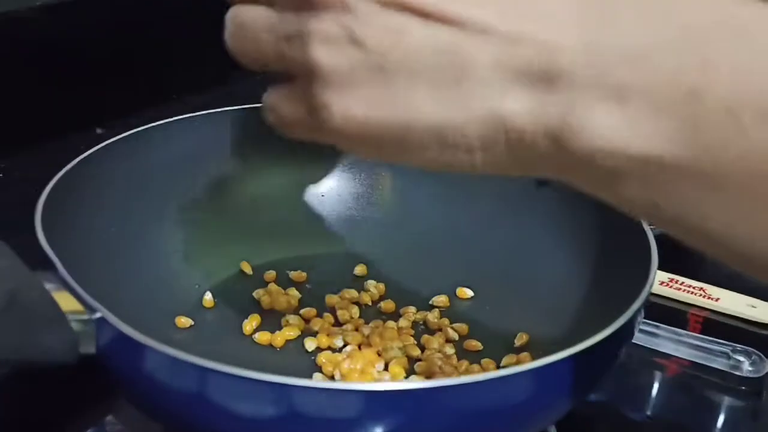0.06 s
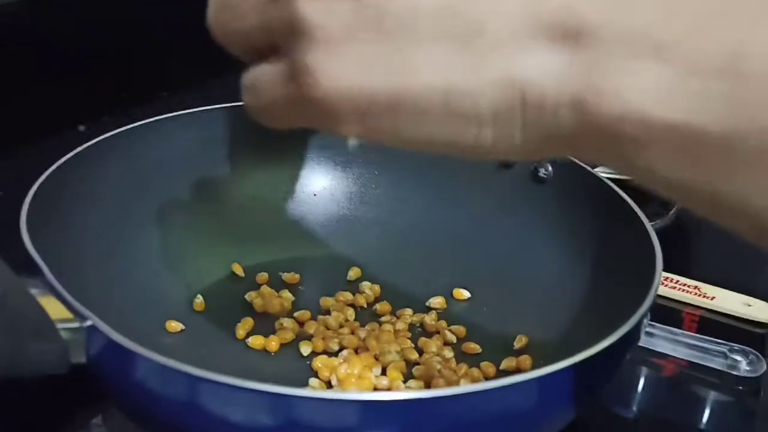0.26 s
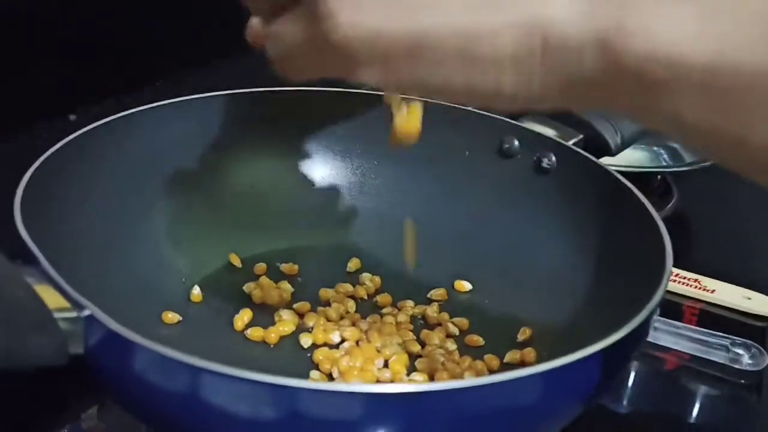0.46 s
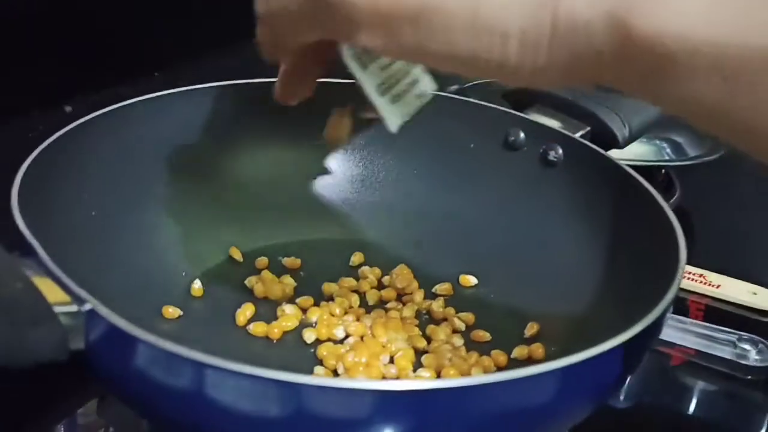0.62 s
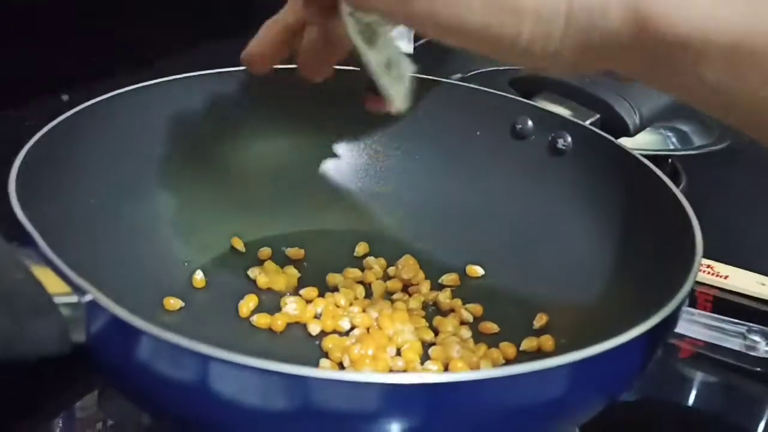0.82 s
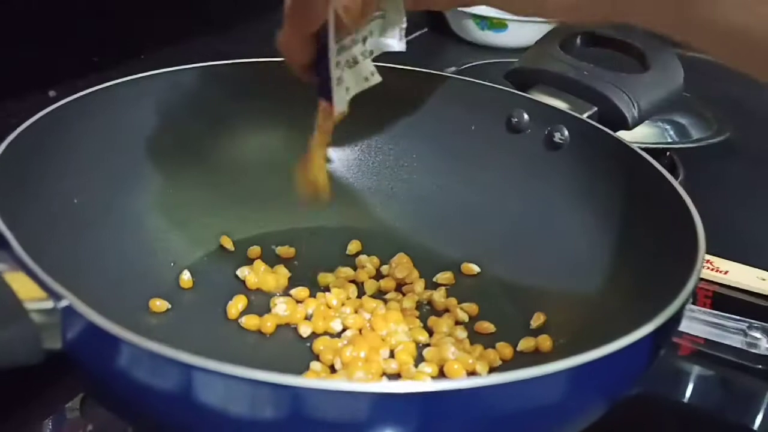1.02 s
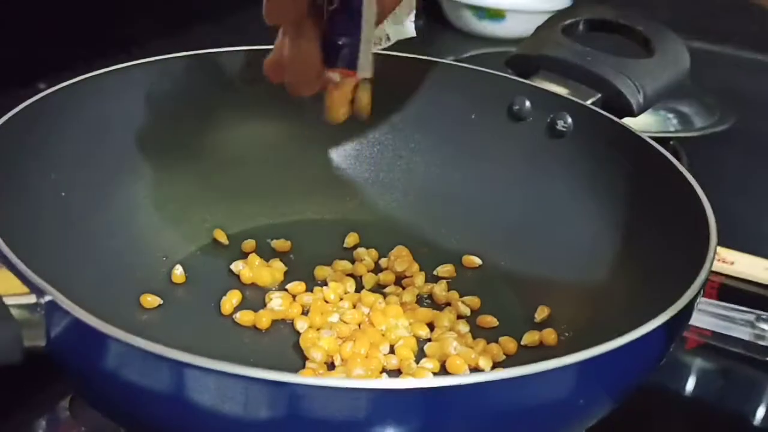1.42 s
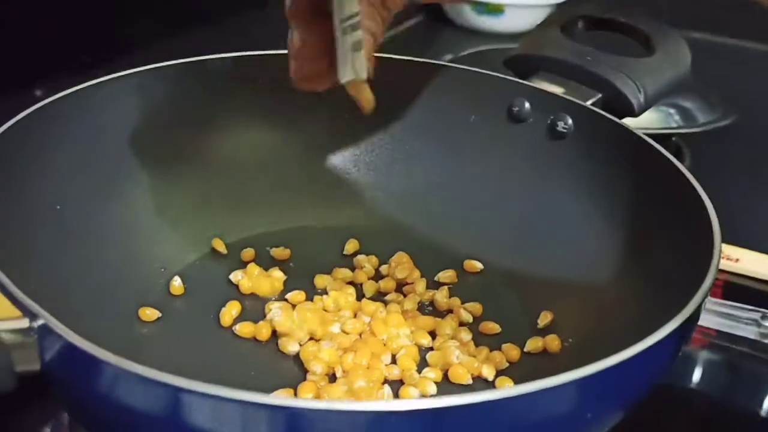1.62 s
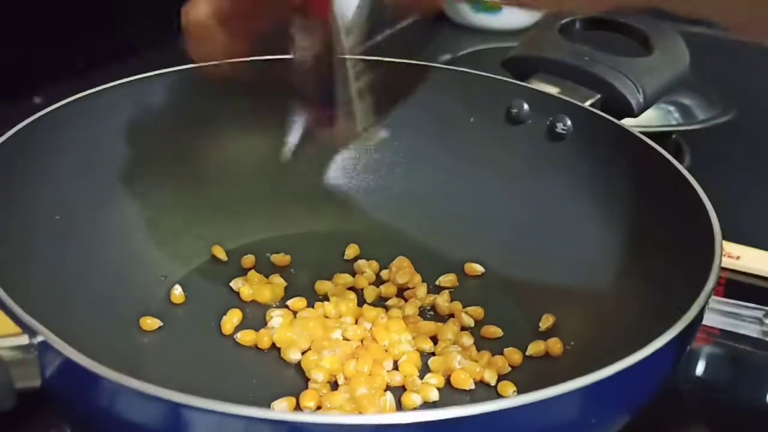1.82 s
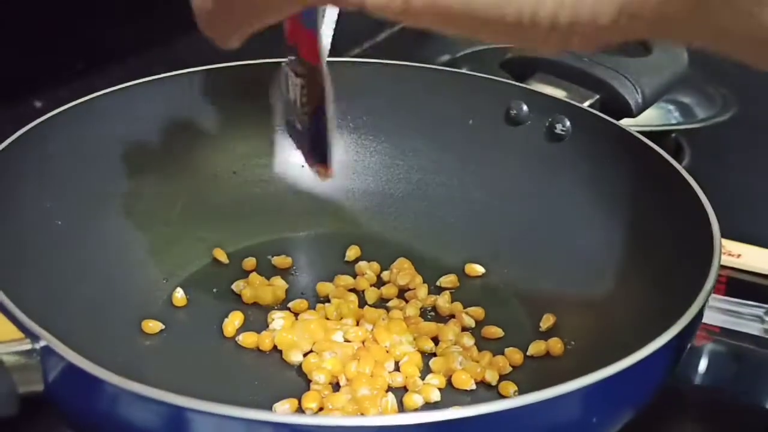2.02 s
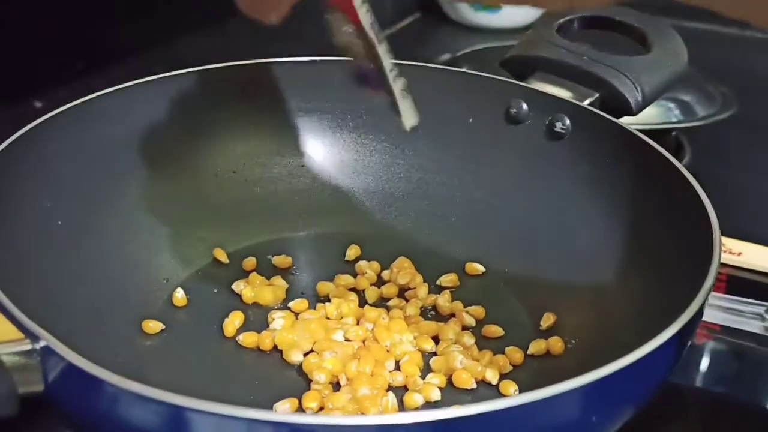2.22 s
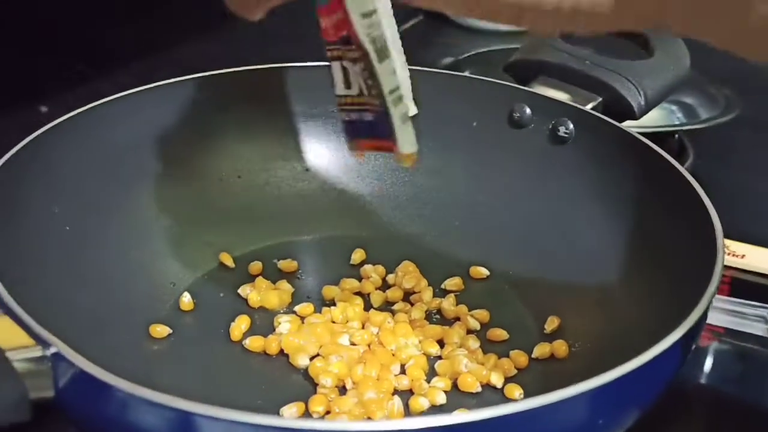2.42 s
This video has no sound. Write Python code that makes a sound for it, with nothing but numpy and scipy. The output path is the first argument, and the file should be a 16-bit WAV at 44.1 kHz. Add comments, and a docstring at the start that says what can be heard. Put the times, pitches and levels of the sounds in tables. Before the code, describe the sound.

Hard corn kernels drop from a crinkling packet, ticking and rattling in a metal pan.

```python
"""Bright clicks over a low rumble: popcorn kernels are shaken from a small packet into a frying pan
on a stove. Each impact, on the metal or on the heap, radiates a click, thuds in the pan's base and
excites the pan's resonant modes. Between the drops the packet snaps and rustles as its creases
buckle. The small kitchen answers clicks and snaps with early reflections and a reverberant tail."""
import sys
import numpy as np
from scipy import signal
from scipy.fft import rfft, irfft, next_fast_len
from scipy.io import wavfile

SR = 44100
rng = np.random.default_rng(int(sys.argv[2]) if len(sys.argv) > 2 else 0)


def wrap_up_sound(samples):
    """Save the sound to the file named by the first command line argument, as 16-bit audio."""
    columns = np.atleast_2d(samples).T
    # keep every value between -1 and 1, then stretch to whole-number steps
    tamed = np.clip(columns, -1, 1)
    steps = np.round(tamed * 32767).astype(np.int16)
    wavfile.write(sys.argv[1], SR, steps)


N = 112454
T = np.arange(N) / SR
BURST_SAMPLES = 4096

# envelope of the rumble: time_s, level_db
RUMBLE_ENVELOPE = [(0, -71), (.1, -63.5), (.35, -56.5), (1.1, -56.5), (1.42, -58.5), (2.2, -54.5),
                   (2.42, -53.5), (2.55, -68.5)]
# spectrum of the rumble: frequency_hz, level_db
RUMBLE_SPECTRUM = [(20, -20), (45, -0.5), (72, 4), (110, -6.5), (160, 1.5), (200, 3), (270, -4.5),
                   (500, -9), (1200, -38), (4000, -34)]
# spectrum of the steady hiss: frequency_hz, level_db
HISS_SPECTRUM = [(50, -3), (300, 2), (1000, 2), (4000, -26), (8000, -8), (13000, -15)]
# reverberation time of the kitchen: frequency_hz, t60_s
ROOM_DECAY = [(150, 0.24), (600, 0.96), (1500, 0.42), (3600, 0.64), (7500, 0.53), (12000, 0.36)]
# colouring of the reverberant tail: frequency_hz, gain_db
ROOM_SPECTRUM = [(100, -22), (700, -5.5), (1500, -10.5), (3000, -3.5), (5000, -15.5), (7500, -8),
                 (12000, -10.5)]
# side signal relative to the diffuse sound: frequency_hz, gain_db
SIDE_SPECTRUM = [(100, -49), (600, -42.5), (2400, -46), (3300, -38.5), (4100, -20.5), (5500, -7),
                 (9000, -7), (13000, -10)]
# brief dips in level: centre_s, depth_db
LEVEL_DIPS = [(0.506, 6.5), (.926, 18), (1.497, 11)]
# envelope of the packet's rustle: time_s, level_db
RUSTLE_ENVELOPE = [(0, -63.5), (.095, -73.5), (.12, -46), (.2, -45.5), (.4, -47), (.68, -52), (.82, -39),
                   (.91, -44.5), (1.03, -41.5), (1.2, -42.5), (1.47, -53.5), (1.68, -46), (1.89, -49),
                   (2.05, -44), (2.22, -63), (2.36, -57), (2.46, -59.5), (2.55, -92)]
# spectrum of the rustle: frequency_hz, level_db
RUSTLE_SPECTRUM = [(150, -34), (700, -3), (1200, -5.5), (2000, 1.5), (3000, 0), (5000, 5), (7800, -9.5),
                   (10000, -10), (13000, -10.5)]
# envelope of the packet rubbing on the fingers: time_s, level_db
RUB_ENVELOPE = [(2.17, -65), (2.22, -40), (2.278, -46.5), (2.297, -44.5), (2.35, -45), (2.41, -54),
                (2.47, -57.5), (2.55, -86)]
# spectrum of the rub: frequency_hz, level_db
RUB_SPECTRUM = [(900, -17.5), (1700, -5.5), (2100, 2), (2650, 0), (3300, -3.5), (5000, -26)]
# snaps of the packet: start_s, energy_db, centre_hz, decay_ms
CREASE_SNAPS = [(0.166, -23, 3580, 2), (0.386, -6.5, 4640, 2.6), (.708, -12.5, 4550, 1.7),
                (.792, 9.5, 3400, 3.2), (0.81, -5, 3060, 4.9), (1.098, -6, 4500, 6.2),
                (1.2537, -6, 4260, 2.2), (1.786, -5.5, 3100, 2), (2.208, -8, 3360, 4.7),
                (2.219, -3.5, 4030, 4.5), (2.29, -3, 2850, 1.5), (2.4275, -16.5, 2800, 4.2)]
# resonances of the pan: frequency_hz, level_db, bandwidth_hz
PAN_MODES = [(742, -19, 140), (1456, -19.5, 130), (1803, -15.5, 200), (2760, -17.5, 320), (3270, -19, 67),
             (3970, -11, 780), (4650, -16.5, 73), (5720, -12, 280), (6070, -5.5, 570), (7020, -7.5, 120),
             (7740, -8, 600), (8570, -11, 310), (8270, -4.5, 840), (12300, -18, 530)]
# spectrum of the base's thud: frequency_hz, level_db
THUD_SPECTRUM = [(25, -18), (55, -8), (90, 0.5), (160, -1.5), (280, 0.5), (500, -5.5), (1200, -27),
                 (4000, -84)]
# spectrum of the wall's knock: frequency_hz, level_db
KNOCK_SPECTRUM = [(100, -15), (370, -5.5), (560, -5.5), (770, -0.5), (1000, -7.5), (1600, -7.5),
                  (3000, -40.5), (8000, -41)]
# spectrum common to all clicks: frequency_hz, level_db
CLICK_SPECTRUM = [(100, -43), (400, -18.5), (750, -18), (1150, -14.5), (1700, -12), (2300, -9), (3300, -5),
                  (4600, 0.5), (6200, -3), (7600, 0.5), (8600, -2), (10200, -8), (11600, -3.5),
                  (13000, -14.5)]
# kernel landings, the last three levels relative to the click:
# start_s, click_db, pitch_hz, tilt_db_per_octave, decay_ms, thud_db, knock_db, rattle_db
LANDINGS = [ (0.1018, -8.5, 4500, 0.61, 4.5, -21.5, -18, -2), (0.112, -14, 5500, -2.4, 2.6, -20, -28, -20),
            (0.2098, 5.5, 5400, -0.7, 3.6, -20.5, -36, 0), (0.215, 6, 7100, -1.6, 5.8, -34, -13, 2.5),
            (0.3263, -1, 6800, 0.45, 7.5, -38, -20.5, -2), (0.3553, -1, 7700, 1.3, 5.6, -22, -34, 0),
            (0.396, 4, 7300, -3, 1.8, -22.5, -34, -5), (0.4276, 8, 6300, 0, 3.7, -21.5, -22.5, -7.5),
            (0.5131, 10.5, 8100, 1.8, 2.9, -22, -14.5, 0.5), (.571, 0.5, 7500, -0.059, 13, -16.5, -14, -4),
            (0.7187, -8, 6550, 0, 1.9, -27, -26, -0.5), (0.754, 4, 5750, -1.8, 1.3, -23, -23.5, 0),
            (.762, 6, 6800, 0, 4.4, -20, -30, 0), (.809, 2.5, 5760, 2, 4.2, -23, -38, -12),
            (.885, -3.5, 6860, 1.7, 7.3, -28, -18, -1), (.933, -0.5, 6040, 4, 6.6, -35, -39, -19),
            (0.938, -1, 4330, 1, 1.9, -23, -28, 3), (0.9398, 10, 8100, 0, 3, -12.5, -15, -3),
            (1.1108, -1, 6300, -0.63, 1.8, -18.5, -17, 0.5), (1.162, 2, 6500, -0.75, 5.2, -28, -40, -1),
            (1.214, -9.5, 6940, 0, 2.3, -30, -26, -21), (1.279, 6, 6400, 2.2, 2.7, -17, -20.5, -36),
            (1.2995, -4, 4760, -0.81, 3, -30, -22, -23), (1.4248, -4, 3000, 0.15, 1.9, -18, -25, 2.5),
            (1.5089, 1.5, 5300, 1.2, 1, -17, -16, 5), (1.5099, 9.5, 7440, 1, 1.5, -21.5, -16, -9),
            (1.586, 8, 7500, -0.95, 2, -25, -25, -8), (1.665, -9, 6550, -1.7, 3.5, -28, -34, 6),
            (1.6992, -8.5, 7000, -1.1, 3.6, -37, -9, -6), (1.7146, 2.5, 5600, -0.69, 0.9, -19.5, -15, -3),
            (1.743, -5, 7000, 1, 1.7, -19, -25, -25), (1.797, -5.5, 7100, -0.42, 1.3, -28, -46, 4),
            (1.807, 0, 5670, 0, 1, -43, -19, -18), (1.834, -3, 7500, -3.3, 2.9, -20, -21, -2),
            (1.9298, 8.5, 6760, 0.36, 2, -19, -16.5, -34), (1.944, -6, 7400, 0.47, 3.4, -24, -30, -16),
            (1.958, -14, 6200, 0.22, 1.4, -13, -30, -17), (1.979, -12.5, 7600, 1, 9, -17, -23, 18),
            (1.9858, 10, 7060, 0.26, 2.7, -22, -22, -12), (2.087, 7.5, 6740, -1.55, 1.4, -18.5, -29, -21),
            (2.116, -5, 7000, 1, 2.9, -33, -35, -18), (2.189, -2.5, 5140, 1.9, 1.4, -14, -14, 4.5),
            (2.287, 0.5, 8000, 1.5, 3.3, -18, -20.5, -21)]


def from_db(db):
    """Amplitude grows tenfold every 20 dB."""
    return 10 ** (np.asarray(db) / 20)


def unit_energy(x):
    """Normalisation: the squared samples sum to 1."""
    return x / np.sqrt(np.sum(x ** 2) + 1e-20)


def at_hz(points, hz):
    """Interpolation on a logarithmic frequency axis."""
    frequencies, values = np.transpose(points)
    return np.interp(np.log(hz + 1), np.log(frequencies), values)


def hump(hz, centre_hz, width_octaves):
    """A spectral peak, Gaussian in log frequency."""
    return np.exp(-.5 * (np.log2((hz + 1) / centre_hz) / width_octaves) ** 2)


def envelope(points):
    """Gain over time, interpolated in decibels."""
    return from_db(np.interp(T, *np.transpose(points)))


def colour(x, curve):
    """Minimum-phase filtering by a dB table or function: folding the cepstrum makes it causal."""
    n = 2 * next_fast_len(len(x))
    hz = np.arange(n // 2 + 1) * SR / n
    gain_db = curve(hz) if callable(curve) else at_hz(curve, hz)
    cepstrum = irfft(np.log(from_db(gain_db)))
    cepstrum[1:n // 2] *= 2
    cepstrum[n // 2 + 1:] = 0
    return irfft(rfft(x, n) * np.exp(rfft(cepstrum)))[:len(x)]


def noise(spectrum):
    """Spectral shaping of white noise; rms 1."""
    return unit_energy(colour(rng.standard_normal(N), spectrum)) * np.sqrt(N)


def grains(per_s, spread_db):
    """Shot noise: independent tiny clicks of uneven size; rms 1."""
    sizes = from_db(spread_db * np.minimum(rng.exponential(1, N), 5)) * rng.choice([-1, 1], N)
    return unit_energy(sizes * (rng.random(N) < per_s / SR)) * np.sqrt(N)


def burst(decay_ms):
    """Damping: densely packed vibrations decay exponentially; energy 1."""
    t_ms = T[:BURST_SAMPLES] * 1000
    return unit_energy(rng.standard_normal(BURST_SAMPLES) * np.exp(-t_ms / decay_ms))


def contact(decay_ms, first_touch=0.58):
    """Impulsive excitation: a hard first touch, then a damped burst."""
    return first_touch * signal.unit_impulse(BURST_SAMPLES) + burst(decay_ms)


def add(out, start_s, sound):
    """Superposition: a sound joins the mix at its start time."""
    i = int(start_s * SR)
    out[i:i + len(sound)] += sound[:N - i]


def background():
    """Two bands of random noise: a slowly varying rumble and a steady hiss."""
    return envelope(RUMBLE_ENVELOPE) * noise(RUMBLE_SPECTRUM), from_db(-67.5) * noise(HISS_SPECTRUM)


def kitchen(direct, gap_s=.003):
    """Reverberation: early reflections and a diffuse tail, each band decaying at its own rate."""
    t, tail = T[:SR], 0
    white, hz = rfft(rng.standard_normal(SR)), np.arange(SR // 2 + 1)
    edges_hz = np.geomspace(40, 16000, num=13)
    for low, high in zip(edges_hz, edges_hz[1:]):
        band = irfft(white * (hz >= low) * (hz < high), SR)
        t60_s = at_hz(ROOM_DECAY, np.sqrt(low * high))
        tail = tail + band * unit_energy(from_db(-60 * t / t60_s) * (t > gap_s))
    response = colour(tail, ROOM_SPECTRUM)
    add(response, gap_s, from_db(-8.5) * burst(decay_ms=9.2))   # off the pan's wall and the stove
    return signal.fftconvolve(direct, response)[:N]


def packet_rub():
    """Friction noise: the emptied packet rubs against the fingers."""
    onset_s = RUB_ENVELOPE[0][0]
    return envelope(RUB_ENVELOPE) * (T > onset_s) * noise(RUB_SPECTRUM)


def packet_rustle():
    """Buckling and friction: the packet crinkles while kernels slide inside it."""
    crinkles = grains(per_s=900, spread_db=2)
    sliding = 0.99 * rng.standard_normal(N)
    rustle = unit_energy(colour(crinkles + sliding, RUSTLE_SPECTRUM)) * np.sqrt(N)
    return envelope(RUSTLE_ENVELOPE) * rustle


def packet_snaps(skirt_db=-11, bass_cut_hz=580):
    """Snap-through buckling: each crease flips over and excites one broad resonance."""
    out = np.zeros(N)
    for start_s, energy_db, centre_hz, decay_ms in CREASE_SNAPS:
        def spectrum(hz):
            resonance = hump(hz, centre_hz, width_octaves=0.48) + from_db(skirt_db)
            return 20 * np.log10(resonance * (hz + 1) / (hz + bass_cut_hz))
        add(out, start_s, from_db(energy_db) * unit_energy(colour(contact(decay_ms), spectrum)))
    return out


def pan_wall(mode_hz=760, mode_db=-13, t60_s=.35):
    """Free vibration: every knock leaves the wall's lowest mode ringing as a damped sinusoid."""
    out, t = np.zeros(N), T[:SR]
    for start_s, click_db, *_, knock_db, _ in LANDINGS:
        pitch_hz = mode_hz * rng.normal(1, .012)
        ring = np.sin(2 * np.pi * pitch_hz * t) * from_db(-60 * t / t60_s)
        add(out, start_s, from_db(click_db + knock_db + mode_db) * unit_energy(ring))
    return out


def pan_ring(coupling_db=-3.5, rattle_t60_s=0.4):
    """Forced vibration: after each landing a dying rattle of kernels drives the pan's modes."""
    start_s, click_db, *_, rattle_db = np.transpose(LANDINGS)
    energy_in = np.zeros(N)
    energy_in[(start_s * SR).astype(int)] = from_db(click_db + rattle_db + coupling_db) ** 2
    retained = from_db(-60 / (rattle_t60_s * SR)) ** 2   # share of energy left after one sample
    power = signal.lfilter([1 - retained], [1, -retained], energy_in)
    rattle = np.sqrt(power) * grains(per_s=2500, spread_db=2.5) + 1e-18
    out = np.zeros(N)
    for k, (hz, mode_db, bandwidth_hz) in enumerate(PAN_MODES):
        radius = np.exp(-np.pi * bandwidth_hz / SR)
        feedback = [1, -2 * radius * np.cos(2 * np.pi * hz / SR), radius ** 2]
        ring = np.sqrt((1 - radius ** 2) / 2) * signal.lfilter([1, 0, -1], feedback, rattle)
        out += (-1) ** k * from_db(mode_db) * ring   # modes alternate in polarity
    return out


def kernel_impacts(peak_db=6, thud_roughness=0.49):
    """Impact sound: each kernel clicks at its own pitch, thuds in the base and knocks the wall."""
    out = np.zeros(N)
    for start_s, click_db, pitch_hz, tilt_db_per_octave, decay_ms, thud_db, knock_db, _ in LANDINGS:
        def click_spectrum(hz):
            peak = peak_db * hump(hz, pitch_hz, width_octaves=0.28)
            tilt = tilt_db_per_octave * np.log2(np.maximum(hz, 1000))
            return at_hz(CLICK_SPECTRUM, hz) + peak + tilt
        push = signal.unit_impulse(BURST_SAMPLES) + thud_roughness * burst(decay_ms=12)
        click = unit_energy(colour(contact(decay_ms), click_spectrum))
        thud = from_db(thud_db) * unit_energy(colour(push, THUD_SPECTRUM))
        knock = from_db(knock_db) * unit_energy(colour(contact(decay_ms=3.3), KNOCK_SPECTRUM))
        add(out, start_s, from_db(click_db) * (click + thud + knock))
    return out


def level_dips(width_s=0.0065):
    """Amplitude modulation: a gain that dips briefly."""
    return from_db(-sum(db * np.exp(-((T - centre_s) / width_s) ** 2) for centre_s, db in LEVEL_DIPS))


def side_scatter(diffuse, flutter_hz=486):
    """Decorrelation: a random walk in phase flutters the treble between left and right."""
    phase = np.cumsum(rng.standard_normal(N)) * np.sqrt(2 * np.pi * flutter_hz / SR)
    return colour(diffuse * np.sqrt(2) * np.sin(phase), SIDE_SPECTRUM)


def scene():
    """Mid-side stereo: pan and packet are central; the treble of tails, rustle and hiss spreads."""
    direct = kernel_impacts() + packet_snaps()
    diffuse = kitchen(direct) + pan_ring() + pan_wall() + packet_rustle() + packet_rub()
    rumble, hiss = background()
    dips = level_dips()
    mid = dips * (direct + diffuse) + rumble + hiss
    side = side_scatter(dips * diffuse + hiss)
    return np.array([mid + side, mid - side])


def record(dry, microphone_top_hz=13050, cutoff_hz=14300):
    """Band limiting and saturation: the microphone loses the top, central peaks round, the top is cut."""
    heard = signal.sosfilt(signal.ellip(8, .2, 45, microphone_top_hz, fs=SR, output="sos"), dry)
    mid = heard.mean(axis=0)
    rounded = heard - mid + np.tanh(mid)
    return signal.sosfilt(signal.ellip(10, .2, 70, cutoff_hz, fs=SR, output="sos"), rounded)


dry = scene()
out = record(dry)
wrap_up_sound(out)
```